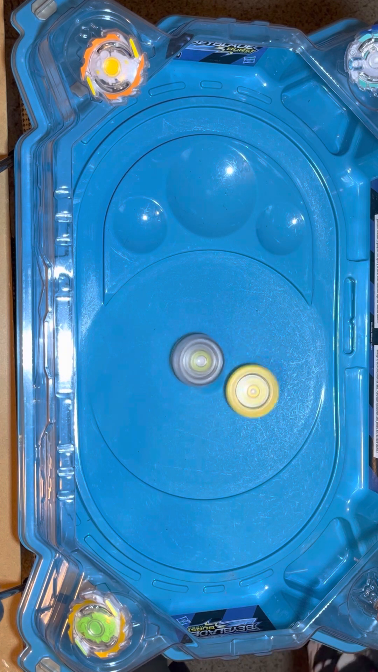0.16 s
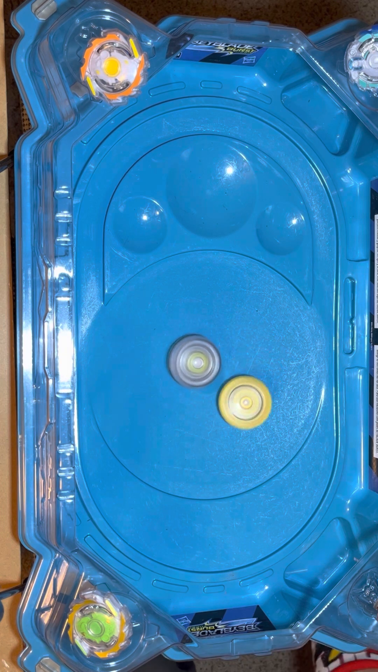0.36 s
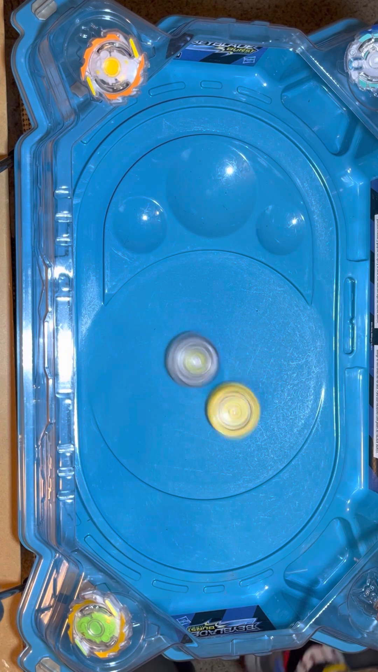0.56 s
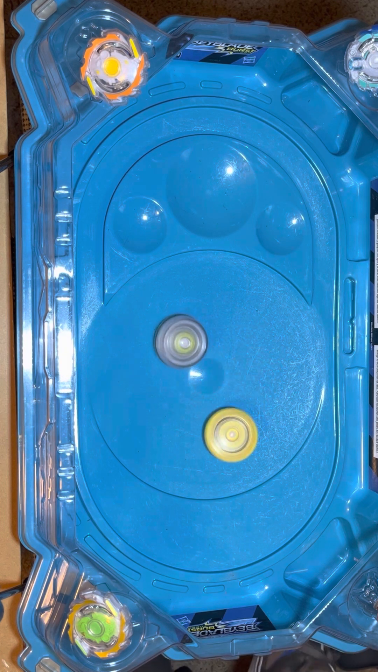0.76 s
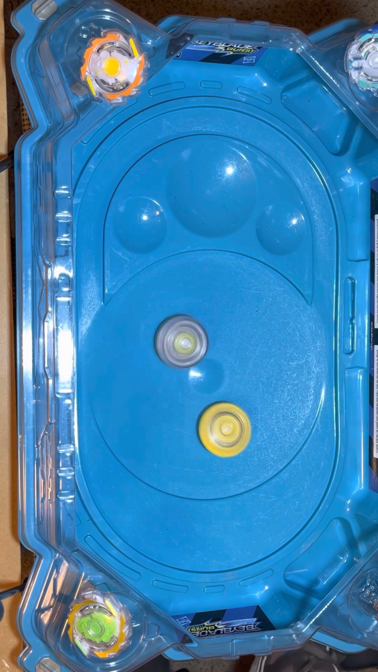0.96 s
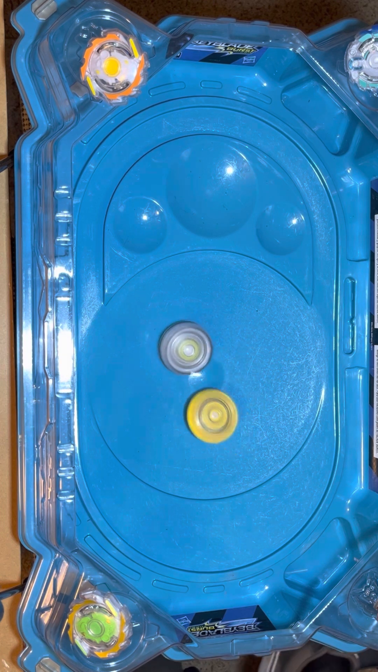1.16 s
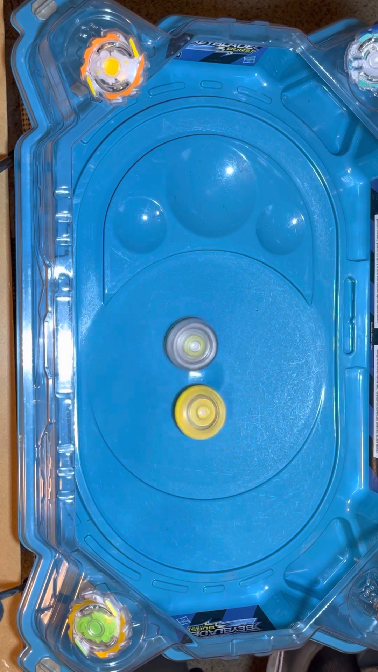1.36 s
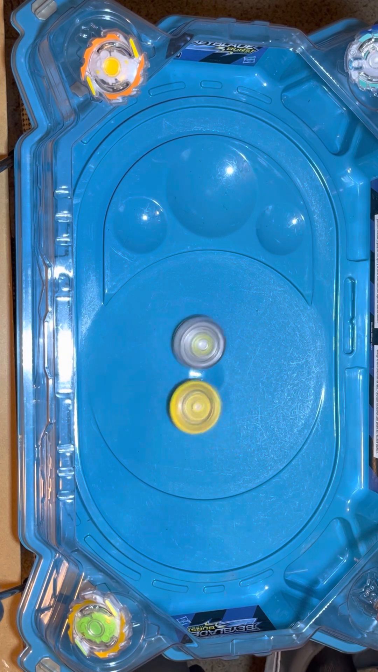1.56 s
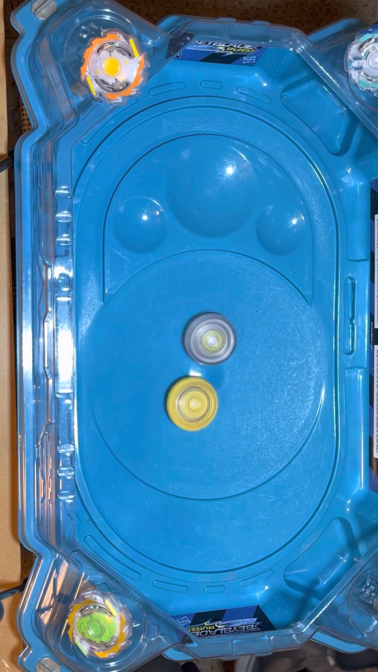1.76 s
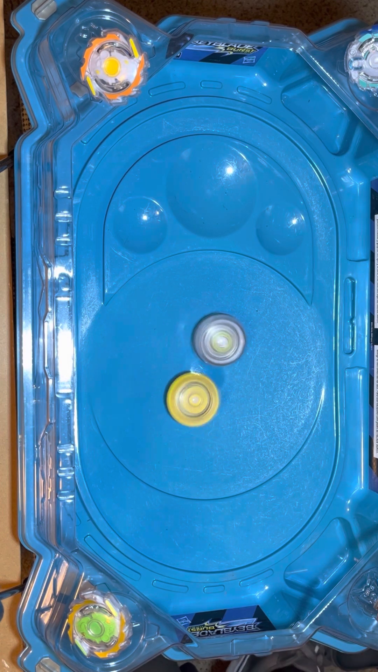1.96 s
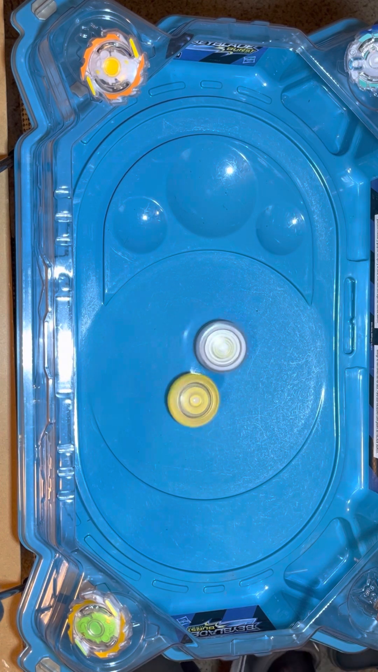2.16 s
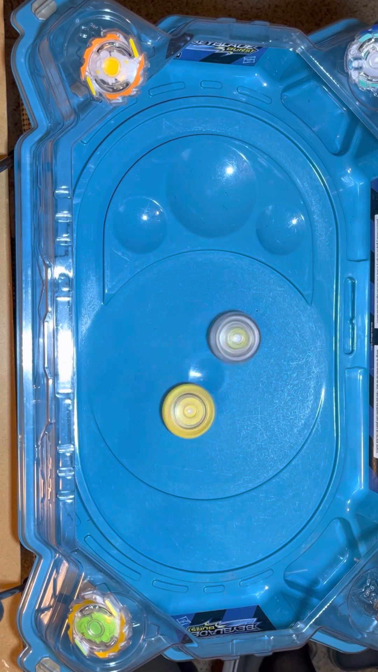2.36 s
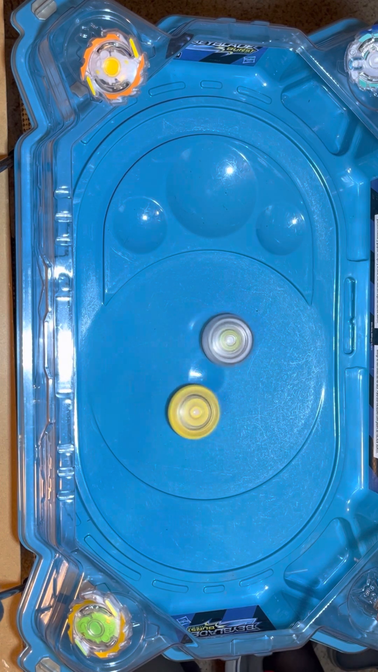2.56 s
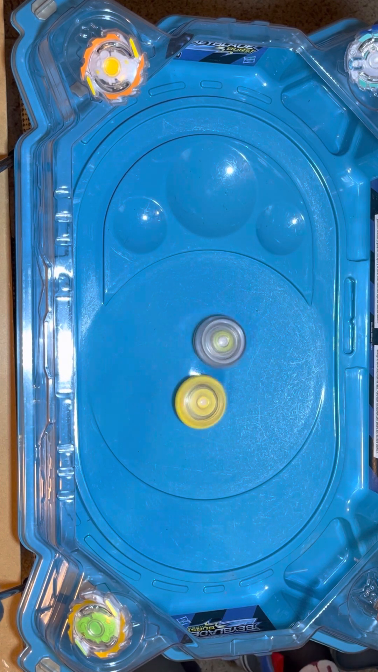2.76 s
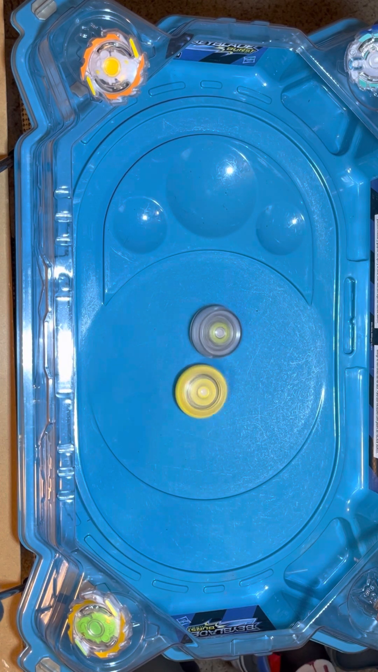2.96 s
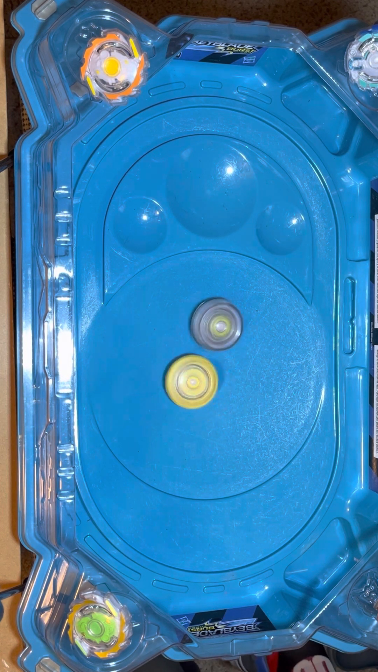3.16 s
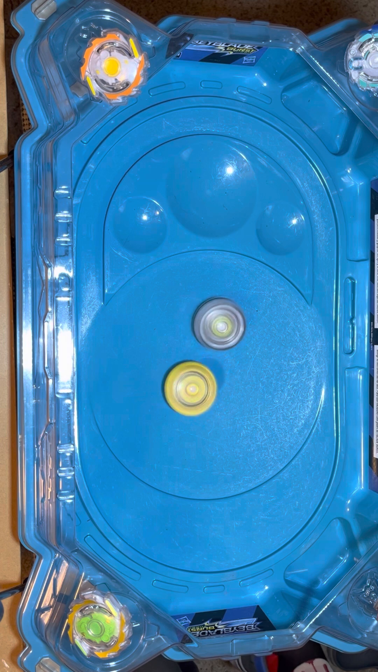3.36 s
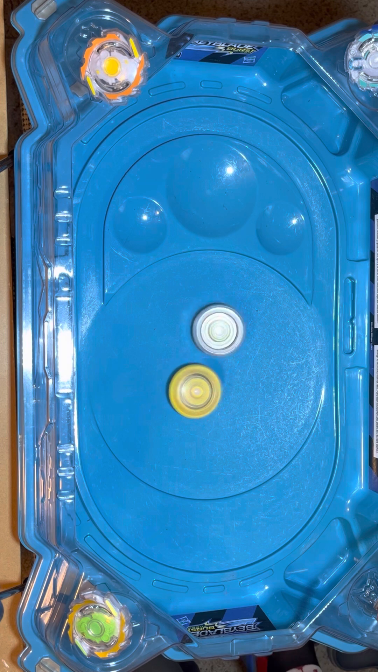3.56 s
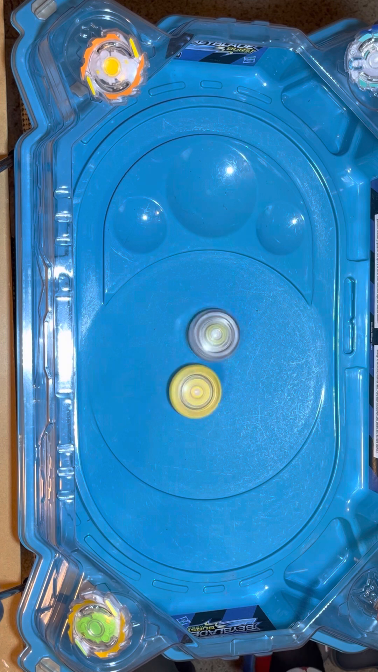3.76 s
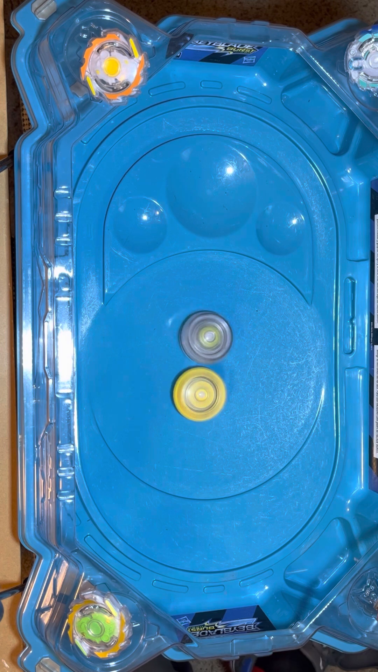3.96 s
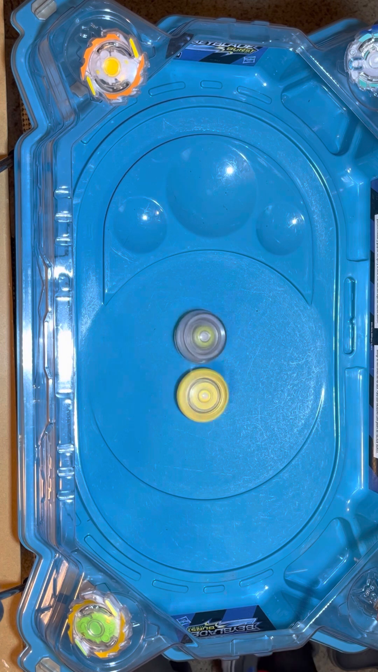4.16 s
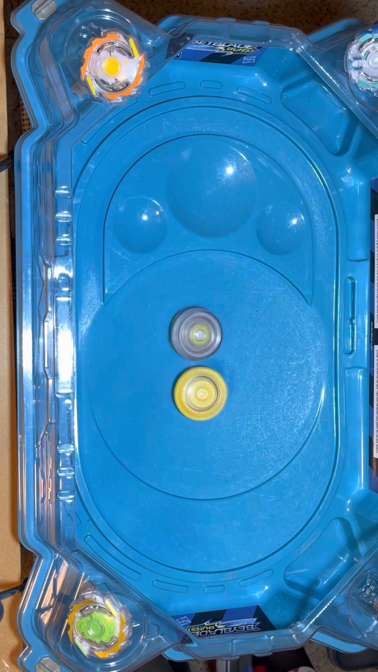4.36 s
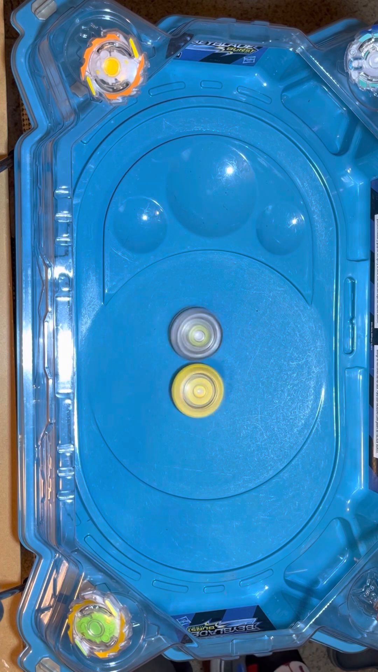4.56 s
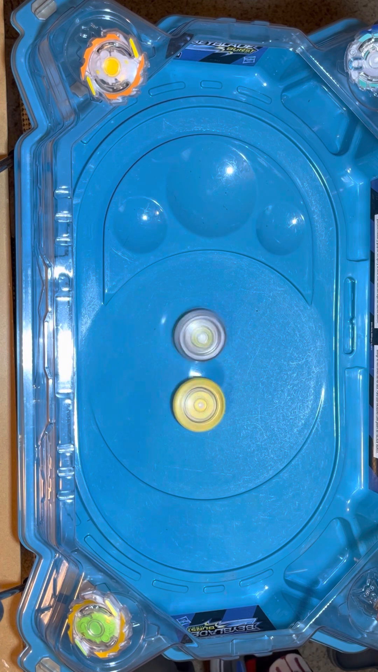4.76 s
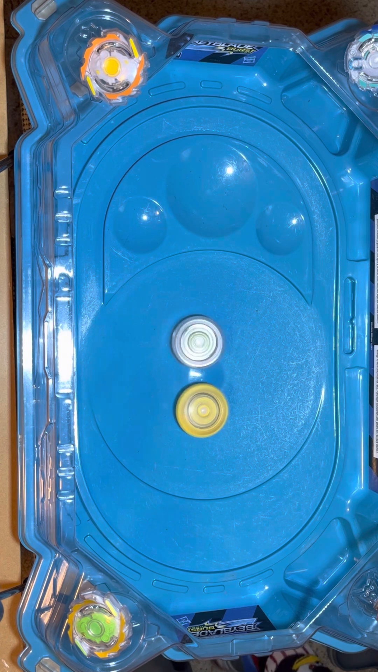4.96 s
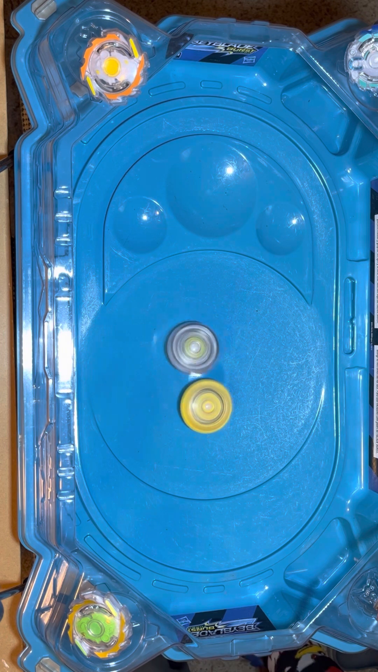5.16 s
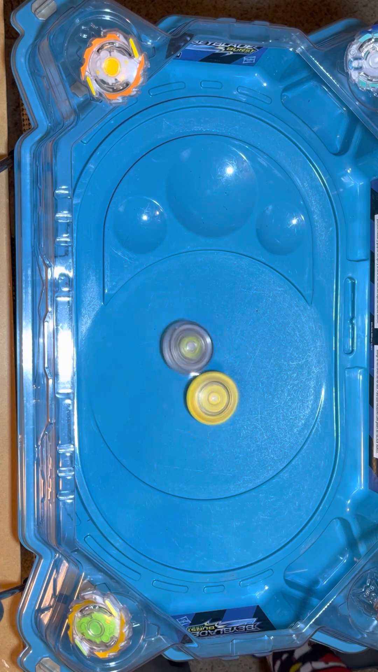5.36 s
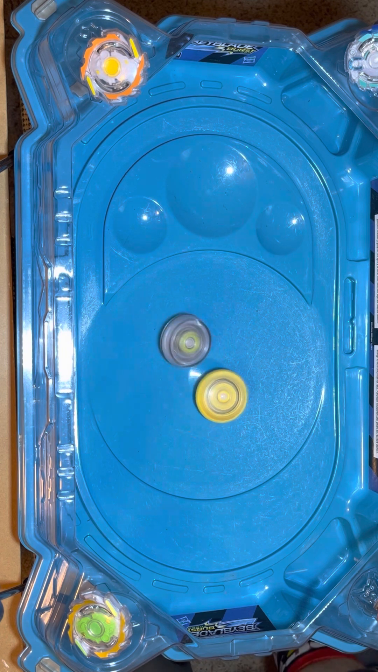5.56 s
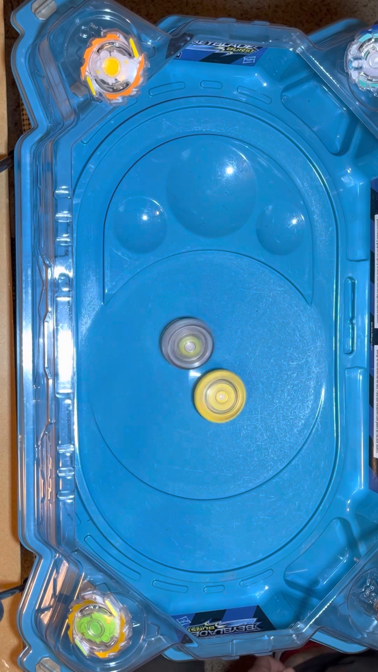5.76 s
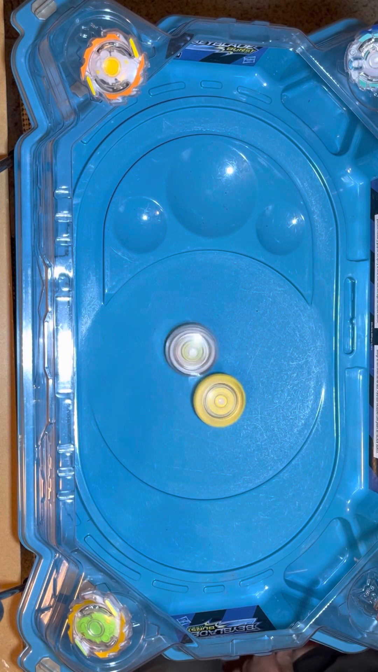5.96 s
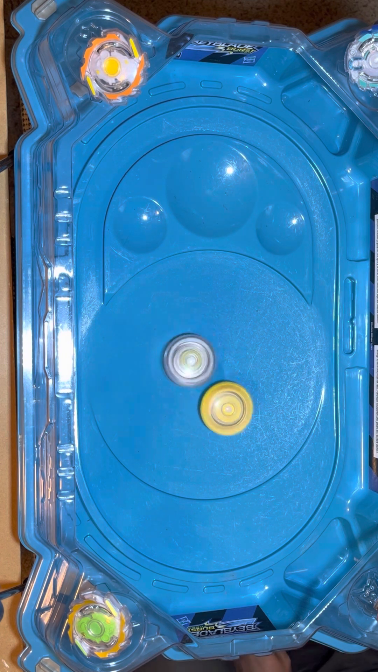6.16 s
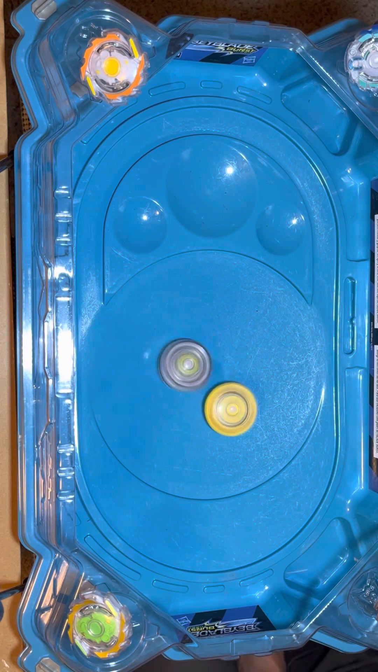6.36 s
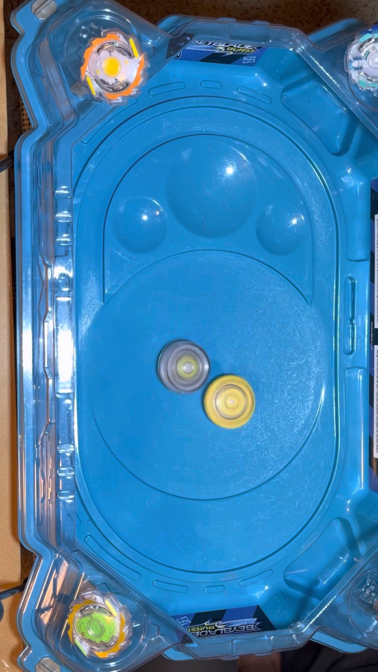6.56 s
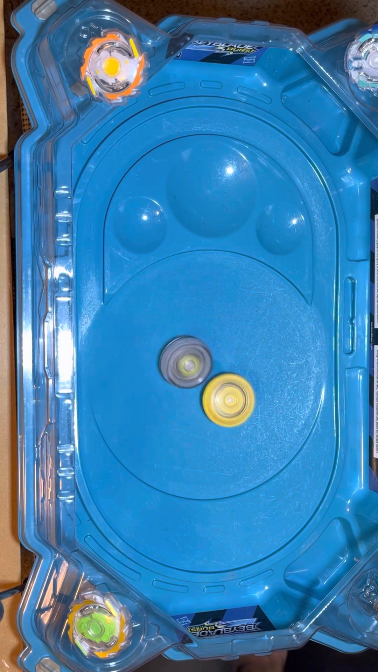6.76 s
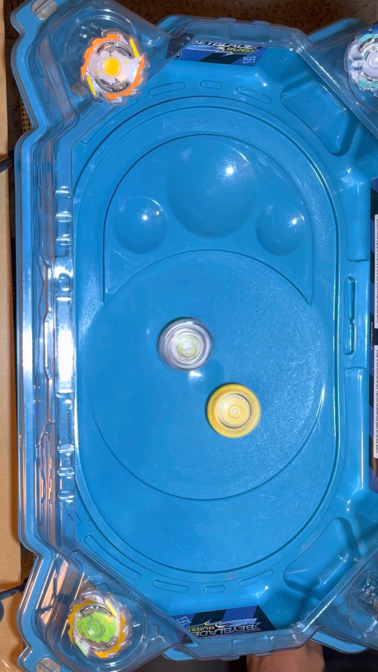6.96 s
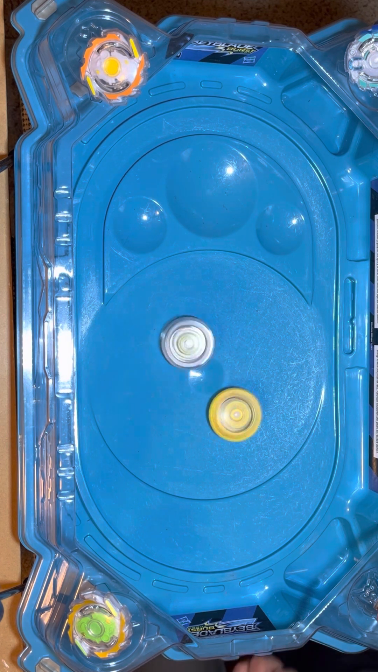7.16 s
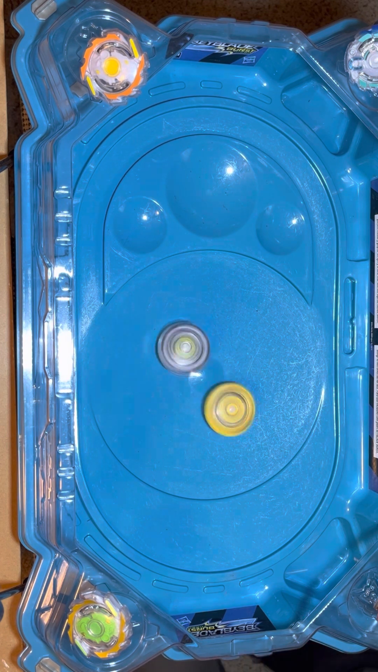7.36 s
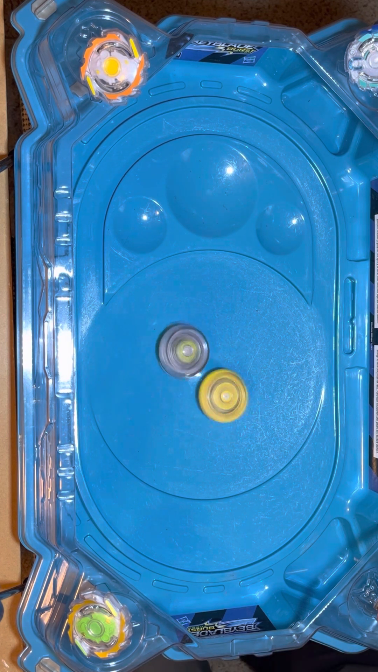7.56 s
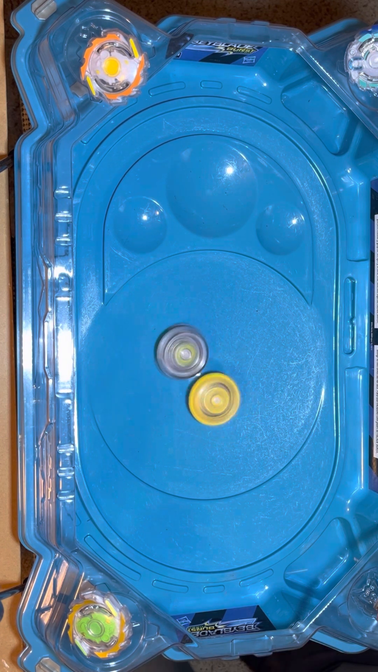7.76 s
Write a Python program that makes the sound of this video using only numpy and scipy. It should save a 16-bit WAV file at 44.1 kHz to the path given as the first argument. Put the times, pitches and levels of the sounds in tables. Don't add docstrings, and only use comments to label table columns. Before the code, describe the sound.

A close, dry stereo view of two spinning tops in a thin plastic arena, with a low hum near 120 Hz wavering throughout. A bright crack comes at 0.1 s, another at 0.55 with a scratchy skid, then fine rapid ticking as a top leans. A tight double lands at about 1.3, then hits at 1.55, 1.9 (double) and 2.25. After a quieter scrape, hollower knocks fall at 2.85 and 3.15, with duller, softer ones at 3.7 and 4.0. A sharp crack at 4.6 leads to faint sliding. A cluster at 5.2-5.4 is followed by quick small ticks until 5.9, when two heavier knocks arrive by 6.1. Loud cracks at 6.65 and 6.9 ring briefly, light scratches follow, and two last clacks come at 7.7 and 7.8. Each hit is a millisecond-sharp toothy snap, a short rim ring, a tray boom and a rattling tail of about a quarter second.

```python
import sys
import numpy as np
from scipy import signal
from scipy.fft import rfft, irfft, next_fast_len
from scipy.io import wavfile
from scipy.ndimage import uniform_filter1d

SR = 44100
rng = np.random.default_rng(int(sys.argv[2]) if len(sys.argv) > 2 else 0)


def dump(signal):
    limited = np.clip(np.atleast_2d(signal).T, -1, 1)
    pcm = np.round(limited * 32767).astype(np.int16)
    wavfile.write(sys.argv[1], SR, pcm)


def makeup_ratio(level_db):
    decades = np.asarray(level_db, float) / 20
    return 10 ** decades


N = 347949
LEAD = 256


def shape(x, points):
    hz, db = np.transpose(points)
    n = next_fast_len(len(x))
    f = np.maximum(np.fft.rfftfreq(n, 1 / SR), 1)
    gain = makeup_ratio(np.interp(np.log(f), np.log(hz), db))
    return irfft(rfft(x, n) * gain, n)[:len(x)]


def tilt(x, db):
    return shape(x, [(4000, 0.0056), (8000, db)])


def unit(x):
    return x / np.sqrt(np.mean(x ** 2))


def band(hz, width_hz, count, order=1):
    x = rng.standard_normal(count)
    for _ in range(order):
        x = signal.lfilter(*signal.iirpeak(hz, hz / width_hz, SR), x)
    return unit(x)


def walk(rate, count=N):
    hold = int(SR / rate)
    steps = np.repeat(rng.standard_normal(count // hold + 1), hold)
    return 1.14 * uniform_filter1d(uniform_filter1d(steps, hold), hold)[:count]


def grit(rate, depth, count=N):
    strength = np.minimum(rng.exponential(size=count), 3)
    presses = (rng.random(count) < rate / SR) * strength
    return unit(1 + depth * signal.lfilter([1], [1, -np.exp(-1 / (0.003 * SR))], presses))


def fade(t, t60):
    return np.exp(-np.log(1000) * t / t60)


def after(count):
    return np.maximum(np.arange(count) - LEAD, 0) / SR


def ring(t, modes, scatter_db, detune, rise_s):
    chance, out = rng.standard_normal((len(modes), 3)), np.zeros(len(t))
    for (hz, db, t60), (a, b, c) in zip(modes, chance):
        u = t[:LEAD + int(1.5 * t60 * SR)]
        wave = np.sin(2 * np.pi * hz * (1 + detune * b) * u + 2 * c)
        out[:len(u)] += makeup_ratio(db + scatter_db * a) * fade(u, t60) * wave
    return out * (1 - np.exp(-t / rise_s))


def louder(*gains):
    return 10 * np.log10(sum(g ** 2 for g in gains))


def add(out, s, x):
    i = int(s * SR) - LEAD
    out[i:i + len(x)] += x[:N - i]


# [f/Hz, level/dB]
ROOM = [(30, -29.5), (55, 0.5), (195, -8), (300, -5.5), (500, -15.5), (1500, -24), (4000, -36.5),
        (15000, -57.5)]


def room():
    return makeup_ratio(-62.5) * unit(shape(rng.standard_normal(N), ROOM)) * makeup_ratio(0.89 * walk(26))


def hum(t):
    mains_hz, motor_hz, in_step_s = 119.95, 122.6, 3.85
    phase = 2 * np.pi * mains_hz * (t - in_step_s) + 0.2 * walk(12)
    motor = makeup_ratio(-8 + 2.7 * walk(3.6)) * np.sin(2 * np.pi * motor_hz * (t - in_step_s))
    lines = np.sin(phase) + makeup_ratio(-22.0) * np.sin(2 * phase + .5) + motor
    return makeup_ratio(-47) * lines + makeup_ratio(-55.5) * band(124.1, 14, N)


# [t/s, rate/turns per s, level/dB]
WOBBLE = [(0, 44, -59), (0.502, 43.3, -55), (.62, 41.3, -65), (.8, 41.1, -55), (1.201, 40.6, -50.5),
          (1.4, 39, -75), (5.098, 21.8, -75), (5.5, 49, -90), (5.898, 28, -76), (6.3, 20.5, -87),
          (7.89, 22, -63.5)]
# [multiple of the rotation rate, level/dB]
WOBBLE_ORDERS = [(2, 2.5), (3, -9.5), (4, -5), (5, -9), (6, -12.5)]


def drone(t):
    s, rate, db = np.transpose(WOBBLE)
    turns_per_s = np.interp(t, s, rate)
    turn = 2 * np.pi * np.cumsum(turns_per_s) / SR
    out = np.zeros(N)
    for k, g in WOBBLE_ORDERS:
        near_mode = np.exp(-((k * turns_per_s - 190) / 20) ** 2)
        out += makeup_ratio(g) * (1 + 2 * near_mode) * np.sin(k * turn + k * k)
    return makeup_ratio(np.interp(t, s, db)) * out, turn


# [t/s, pressure level/dB, slip level/dB, lean level/dB]
BEARING = [(0, -57, -2.5, 1), (.3, -58, -8, -1), (1.2, -56.5, -5, 3), (1.45, -61, -9.5, 4.5),
           (1.75, -59.5, 0.5, 4), (2.1, -59.5, -7.5, -2.5), (2.8, -71, -4, 12), (2.97, -51, -24.5, 2.5),
           (3.25, -57, -8.5, 3.5), (4.2, -60, -14.5, -0.5), (4.55, -59.5, -1, -1.5), (5.2, -71, -11.5, 1),
           (5.45, -53.5, -28, -2), (5.8, -51.5, -13, 1.5), (6.07, -50.5, -8, -28), (6.3, -60.5, -8, -7.5),
           (7.1, -70.5, -7, 8.5), (7.89, -54.5, -21, -1.5)]


def effort(t):
    slow = t[::64]
    s, press_db, slip_db, lean_db = np.transpose(BEARING)

    def since(moment):
        return np.maximum(slow - moment, 0)

    rocking = [makeup_ratio(row[1] - 40.5) * (slow > row[0]) * fade(since(row[0]), 0.8) for row in CLASHES]
    scrape_db = louder(makeup_ratio(np.interp(slow, s, press_db)), *rocking)
    shaking = []
    for start, length, db, _ in SKIDS:
        if min(abs(start - row[0]) for row in CLASHES) < .1:
            onset = 1 - np.exp(-since(start) / 0.019)
            shaking.append(makeup_ratio(-40.5 + 2 * (db + 49)) * onset * fade(since(start + length), 0.27))
    pressed_db = -57.5 + 1.33 * (scrape_db + 61.0) + np.interp(slow, s, lean_db)
    rumble_db = louder(makeup_ratio(pressed_db), *shaking)
    levels = scrape_db, scrape_db + np.interp(slow, s, slip_db), rumble_db
    return [np.interp(t, slow, db) + 1.2 * walk(7) for db in levels]


# [f/Hz, width/Hz, level/dB]
SCRAPE = [(840, 180, 6), (1250, 680, 8.5), (1800, 200, 5.5), (2280, 150, 1.5)]
# [f/Hz, width/Hz, level/dB]
HISS = [(3250, 900, 2.5), (3970, 390, -3.5), (5450, 170, -1.5), (6300, 480, 1.5), (11500, 2300, -5)]


def tips(scrape_db, hiss_db, rumble_db, turn):
    press = makeup_ratio(2.1 * np.cos(turn) + 2.0 * walk(35))
    scrape = sum(makeup_ratio(g + 3.8 * walk(14)) * band(hz, w, N) for hz, w, g in SCRAPE)
    hiss = sum(makeup_ratio(g + 2.4 * walk(30)) * band(hz, w, N) for hz, w, g in HISS)
    rough = grit(rate=120., depth=.9)
    high_pass = signal.butter(4, 42, "high", fs=SR, output="sos")
    rumble = signal.sosfilt(high_pass, band(63, 24, N) + makeup_ratio(-0.5) * band(87, 28, N))
    sliding = makeup_ratio(scrape_db - 3.5) * rough * unit(scrape) + makeup_ratio(hiss_db) * unit(hiss)
    return press * sliding + makeup_ratio(rumble_db - 4.0) * unit(rumble)


# [t/s, peak level/dB, tray knock level/dB, tray boom level/dB, tail level/dB]
CLASHES = [(0.0912, -8, -40, -27.5, -24.5), (0.545, -12, -30.5, -19.5, -17),
           (1.267, -10.5, -24, -29.5, -19), (1.3081, -10.5, -18, -18.5, -22),
           (1.5394, -10.5, -23, -23, -18.5), (1.8717, -9, -25.5, -25.5, -21),
           (1.9208, -11.5, -13.5, -22.5, -24), (2.2369, -7, -23.5, -21.5, -22.5),
           (2.84, -15, -16, -14, -17.5), (3.134, -13, -13.5, -18.5, -21.5), (3.717, -21, -14, -18.5, -18.5),
           (4.0194, -24, -18.5, -30, -21.5), (4.5826, -8, -13, -22, -24), (5.2283, -18.5, -39.5, -27, -22),
           (5.25, -19, -20.5, -25, -26), (5.357, -8, -30, -31.5, -25.5), (5.905, -17.5, -18.5, -20, -19.5),
           (6.099, -21, -21, -16, -21.5), (6.6395, -20, -39, -24, -20), (6.659, -6, -21, -32.5, -23),
           (6.877, -8, -25, -23.5, -19.5), (7.6802, -11.5, -24, -19.5, -22.5),
           (7.817, -10, -18, -17.5, -21)]
# [loudest t/s, build-up/ms, ring-down/ms, brightness level/dB, tail length/share]
CRACKS = [(0.0928, 1.1, 8.8, -1, 1), (0.5457, 0.69, 9, 3, 0.94), (1.268, 0.86, 10, -1, 1),
          (1.3088, 0.62, 13, -2, 0.77), (1.5412, 0.41, 3.5, 1, 0.97), (1.8727, .5, 8, 0.5, 0.82),
          (1.921, .7, 14, -1.5, 0.89), (2.2386, 1.3, 5.9, -3.5, 0.96), (2.8413, 1, 20, -1.5, 0.89),
          (3.135, 0.59, 11, 3.5, 0.75), (3.7184, 0.76, 18, -2.5, 0.89), (4.0212, 1.2, 5.7, 2, 0.81),
          (4.5834, 0.51, 11, 2.5, 0.79), (5.2283, 0.7, 6.1, 0, 1), (5.2514, 0.55, 9, 0, 0.84),
          (5.3586, 0.8, 8.1, -1, 0.91), (5.9061, 0.53, 16.6, 0.5, 0.93), (6.102, 1.5, 6, -2, 0.7),
          (6.6399, .6, 12, 1.5, 1), (6.6598, 0.35, 8.8, -1, 0.83), (6.8781, 1.3, 6.1, -2.5, 0.85),
          (7.6819, 0.46, 10, -4, 0.75), (7.8165, 0.54, 13, -1, 1)]
KNOCK_HZ = [790, 760, 960, 640, 640, 700, 790, 960, 880, 750, 700, 800, 800, 960, 830, 640, 815, 760, 700,
            640, 800, 700, 860]
# [f/Hz, level/dB]
CRACK = [(500, -30), (1200, -9.5), (2000, -3), (4000, -5.5), (7000, -1), (10000, -7.5), (12000, -7),
         (14300, -9), (14800, -9), (15600, -6), (17000, -12.5)]
# [f/Hz, level/dB, t60/s]
RIMS = [(1154, -5.5, 0.075), (1235, -14.5, 0.085), (1750, -18, 0.014), (1800, -5, 0.025),
        (2020, -7.5, 0.026), (2276, -3.5, 0.15), (2836, 3, 0.039), (3190, -8.5, 0.015), (3720, -2.5, 0.018),
        (4500, -6, 0.01), (5080, 0, 0.086), (6430, -9.5, 0.037), (7600, -8, 0.021), (8000, -3.5, 0.0086),
        (9400, -10, 0.011), (12150, -9, 0.022), (13900, -9, 0.033)]
# [f/Hz, level/dB, t60/s]
TAIL = [(258, -9, 0.32), (680, -11, .35), (1180, -5.5, 0.23), (2400, -1.5, 0.24), (4930, -1, 0.23),
        (9000, -8, 0.21), (13800, -12.5, 0.24)]
# [f/Hz, level/dB, t60/s]
TRAY = [(636, -2.5, 0.13), (759, -7.5, 0.13), (830, 2.5, 0.054), (962, -7.5, 0.083), (402, -14, 0.28)]
# [f/Hz, level/dB, t60/s]
BOOM = [(56.2, -14, .35), (67, -6, 0.23), (78.2, -3, 0.45), (100.6, -3, 0.17), (144.8, -1, .3),
        (197.6, -6.5, 0.3), (257.6, -8, 0.24), (302.6, -9.5, 0.13)]


def clashes():
    out, t = np.zeros(N), after(count=16384)
    hz, crack_db = np.transpose(CRACK)
    for clash, crack, knock_hz in zip(CLASHES, CRACKS, KNOCK_HZ):
        s, db, knock_db, boom_db, tail_db = clash
        peak_s, rise_ms, fall_ms, bright_db, share = crack
        start = s - .0003
        u = 1000 * ((np.arange(len(t)) - LEAD) / SR + start - peak_s)
        build_up = np.exp(-(np.minimum(u, 0) / max(rise_ms, .2)) ** 2)
        chatter = rng.uniform(-1.7, 1.7, len(t)) * build_up
        late = shape(chatter * makeup_ratio(-16.0) * fade(np.maximum(u, 0), 53.0), [(13800, -0.5), (14600, -35.5)])
        chatter = chatter * fade(np.maximum(u, 0), fall_ms) + late
        colour = np.transpose([hz, crack_db + 1.2 * rng.standard_normal(len(hz))])
        hit = makeup_ratio(5.5) * shape(chatter, colour)
        hit += makeup_ratio(-23.5) * ring(t, RIMS, scatter_db=1.5, detune=0.013, rise_s=0.00062)

        tail = np.zeros(len(t))
        for f, g, t60 in TAIL:
            knock_lift_db = (f < 800) * 0.78 * (knock_db + 22.5)
            lumps = makeup_ratio(g + 2.0 * walk(70, count=len(t)) + knock_lift_db)
            tail += lumps * band(f, 1.02 * f, len(t), order=2) * fade(t, t60 * share)
        tail *= grit(rate=160., depth=1., count=len(t))
        tail = shape(tail, [(13800, 0), (14600, -35)])
        fed = np.zeros(len(t))
        for (f, _, _), c in zip(RIMS, rng.standard_normal(len(RIMS))):
            fed += makeup_ratio(2.5 * c) * signal.lfilter(*signal.iirpeak(f * (1 + .025 * c), 30, SR), tail)
        tail += makeup_ratio(-2.0) * fed

        lift_db = 8.5 + 0.5137 * db + 0.3 * (tail_db + 20.5) + bright_db
        hit = tilt(hit + makeup_ratio(tail_db) * tail * (1 - np.exp(-t / 0.0057)), lift_db)
        tray = [(f, g + 3 - 13 * abs(np.log2(f / knock_hz)), t60) for f, g, t60 in TRAY]
        hit += makeup_ratio(knock_db + 0.5) * ring(t, tray, scatter_db=1.5, detune=.02, rise_s=.003)
        hit += makeup_ratio(boom_db) * ring(t, BOOM, scatter_db=2.5, detune=.03, rise_s=0.015)
        add(out, start, makeup_ratio(db) * hit)
    return out


# [t/s, low ring level/dB, low f/Hz, high f/Hz, high minus low level/dB]
SPOTS = [(0.092, -16.5, 2836, 6920, 15.5), (0.5443, -6.5, 1750, 7900, -17.5),
         (1.2658, -10, 1768, 7200, -18.5), (1.3106, -16, 1747, 8950, -3), (1.5404, -30, 1747, 7100, 8.5),
         (1.8727, -15.5, 1810, 8300, -3.5), (1.9205, -16, 1865, 4860, 2), (2.236, -26, 1744, 8600, -1.5),
         (2.8409, -17, 1870, 7330, -10), (3.1325, -23, 1750, 4980, 15), (3.718, -24, 1927, 5250, 8),
         (4.0178, -26, 1800, 4990, 5), (4.5854, -33, 1800, 8130, 14.5), (5.2264, -25, 1824, 7000, 4.5),
         (5.2503, -32, 2050, 7460, 8), (5.3593, -12.5, 1764, 8240, -22), (5.908, -18, 1750, 4930, 2),
         (6.098, -30, 1910, 7600, 6), (6.6373, -28, 1860, 3650, 2), (6.6578, -11, 1800, 7600, -11),
         (6.8768, -20, 2090, 7700, -3), (7.679, -15, 1800, 8000, -4), (7.816, -37, 1800, 8400, 0)]


def spots():
    out, t = np.zeros(N), after(SR // 8)
    for s, db, low_hz, high_hz, high_db in SPOTS:
        modes = [(low_hz, -8, .045), (high_hz, high_db - 8.0, .02)]
        add(out, s, makeup_ratio(db) * ring(t, modes, scatter_db=2.5, detune=0, rise_s=0.00072))
    return out


# [t/s, f/Hz, level/dB, t60/s]
PINGS = [(.531, 5040, -38, 0.11), (.5575, 5000, -19.5, 0.022), (.570, 4180, -29, .02),
         (1.5524, 1050, -14.5, 0.0087), (1.533, 1240, -41.5, .05), (2.829, 2000, -54, 0.05),
         (6.869, 4500, -40, .05), (4.34, 1770, -45, 0.028), (4.378, 1500, -49, 0.044),
         (.095, 760, -34.5, .06), (5.518, 3750, -51, 0.065), (5.5465, 3750, -52, .05),
         (5.5655, 3750, -51, 0.057), (5.6139, 3800, -47, 0.04), (5.6398, 3750, -53, .05),
         (5.7092, 3850, -47.5, .05), (5.7566, 3750, -52, .05), (5.805, 3750, -50, 0.057),
         (6.2283, 3590, -53, 0.028), (6.2283, 1750, -50.5, .03), (6.2502, 3400, -44, 0.038),
         (6.343, 993, -55, 0.034), (6.3774, 1854, -47.5, .03), (6.3959, 1800, -50, .03),
         (6.438, 1800, -56, .04), (6.4822, 3800, -60, .03), (6.5, 3650, -60, 0.033),
         (6.5366, 1910, -61, .03), (6.5855, 3950, -55.5, 0.026), (6.588, 1098, -49.5, .03),
         (7.1572, 3870, -46, 0.027), (7.1836, 3840, -44.5, 0.032), (7.198, 3710, -52, .03),
         (7.3602, 3750, -63, 0.056), (7.3872, 3750, -57, 0.036), (7.4036, 3750, -44, 0.024),
         (7.42, 3900, -58.5, .03), (7.5683, 3800, -61, .03), (7.5827, 3830, -53.5, .03),
         (6.94, 1887, -36, .04), (6.952, 3920, -33, 0.026)]


def pings():
    out, t = np.zeros(N), after(count=8192)
    for s, f, db, t60 in PINGS:
        pair = [(f, 0, t60), (.965 * f, -2, t60)]
        add(out, s, makeup_ratio(db) * ring(t, pair, scatter_db=1., detune=.004, rise_s=.0015))
    return out


# [first t/s, last t/s, rate/turns per s, peak level/dB, brightness level/dB]
RUNS = [(0.312, .512, 51, -53, -15.5), (0.749, .844, 41.1, -35, -18), (0.868, .966, 43, -36, -22),
        (1.067, 1.112, 45, -43, -11), (1.139, 1.2356, 40.6, -34.5, -12), (2.591, 2.647, 37, -41.5, -6),
        (3.316, 3.478, 22, -40, -20), (4.095, 4.254, 25, -39, -17), (6.557, 6.5843, 34, -41, -32)]


def catches():
    rows, jitter_s, scatter_db = [], .0008, 2.
    for first, last, rate, db, bright_db in RUNS:
        chance = rng.standard_normal((16, 3))
        for s, (a, b, c) in zip(np.arange(first, last + .5 / rate, 1 / rate), chance):
            rows.append((s + jitter_s * a, db + scatter_db * b, bright_db + scatter_db * c))
    return rows


# [t/s, peak level/dB, brightness level/dB]
TICKS = [(0.695, -35, -11), (1.0136, -30, -19), (1.04, -26, -17), (1.9795, -18.5, -26), (2.3182, -29, -23),
         (2.999, -30.5, -9.5), (3.028, -43, 2), (3.9665, -34, -26), (4.8384, -30.5, -7.5),
         (5.309, -37, -18), (5.4493, -32, -20), (5.4757, -30, -8), (5.4992, -36, -11), (5.519, -29.5, -6),
         (5.5465, -41, -18), (5.5653, -29.5, -7), (5.594, -34, -18), (5.6139, -29.5, -7),
         (5.64, -37.5, -20), (5.663, -30.5, -11), (5.71, -30, -8.5), (5.756, -30, -7), (5.78, -36, -20),
         (5.805, -30.5, -6.5), (5.8494, -44, -20), (5.8701, -31.5, -13), (6.0800, -23, -23),
         (6.2287, -46.5, -22.5), (6.2516, -26, -12.5), (6.4824, -41, -21), (6.81, -29, -21),
         (6.979, -16, -18), (7.1547, -33, -26.5), (7.185, -37, -31.5), (7.293, -36.5, -23),
         (7.4043, -36.5, -20), (7.7798, -34.5, -15), (6.9397, -21, -19), (7.735, -36.5, -20)]
# [f/Hz, level/dB]
TICK = [(800, -22), (1400, -5), (2050, 4), (2700, -8), (3750, -6), (4600, -9), (5600, -12), (7100, -2),
        (9000, -11), (12800, -8), (16000, -18)]


def ticks():
    out, t = np.zeros(N), after(count=4096)
    for s, db, bright_db in TICKS + catches():
        noise = rng.standard_normal((2, len(t))) * (t > 0)
        click, scratch = noise * [fade(t, .008), fade(t, .06)]
        body = unit(shape(click, TICK)) + makeup_ratio(-1) * unit(shape(scratch, TICK))
        add(out, s - .0003, makeup_ratio(db - 31.0) * tilt(body, max(bright_db, -18) + 3.5))
    return out


# [t/s, length/s, level/dB, brightness level/dB]
SKIDS = [(0.562, 0.1, -46, -2), (1.932, 0.066, -54.5, 12.5), (2.264, 0.093, -48.5, -20),
         (2.864, 0.045, -47.5, -10), (4.271, 0.18, -62.5, 5), (4.402, 0.24, -57.5, 5),
         (4.832, 0.072, -57, -0.5), (5.926, 0.12, -49.5, 6.5), (6.36, 0.072, -50.5, 3),
         (6.891, 0.12, -45, 3.5), (7.159, 0.048, -55.5, -12), (7.358, 0.066, -64, -9),
         (7.524, 0.1, -65, -14), (7.603, 0.053, -46, -3), (7.701, 0.093, -50, -14)]
# [f/Hz, width/Hz, level/dB]
DRAG = [(400, 90, 0.5), (762, 150, 4), (1280, 450, 5), (3400, 3900, 4.5), (1800, 100, 5.5), (2050, 220, 4),
        (2858, 300, 1), (3750, 160, -0.5), (4110, 200, -5.5), (5000, 470, 0), (7600, 3700, -6.5),
        (11800, 2600, -6)]


def skids():
    out, t = np.zeros(N), after(count=12288)
    for s, length, db, bright_db in SKIDS:
        drag = sum(makeup_ratio(g + 2.8 * walk(70, count=len(t))) * band(hz, w, len(t)) for hz, w, g in DRAG)
        drag *= grit(rate=150., depth=.5, count=len(t))
        bite = 1 - np.exp(-t / (0.6 * length ** 2))
        drag *= bite * fade(np.maximum(t - length, 0), 0.12) * fade(t, 8.9 * length)
        colour = [(2400, 0.004), (3600, 0.68 * bright_db), (8000, bright_db)]
        add(out, s, makeup_ratio(db) * shape(unit(drag), colour) / np.sqrt(3))
    return out


# [t/s, f/Hz,
# level/dB]
BUMPS = [(.6, 1800, -28), (1.268, 1100, -21), (1.541, 2210, -22), (2.239, 1046, -24), (2.272, 1045, -32),
         (2.32, 750, -35), (2.355, 1100, -39.5), (2.905, 760, -34), (2.985, 2050, -47), (3.155, 736, -30),
         (3.24, 730, -44), (3.265, 950, -45), (3.355, 706, -47), (3.45, 950, -46), (3.473, 960, -44),
         (3.49, 1250, -47), (3.56, 1230, -48), (3.635, 880, -45), (4.843, 418, -40), (4.935, 558, -52.5),
         (4.967, 1150, -53), (5.27, 800, -42), (5.52, 910, -47), (5.565, 1530, -40), (5.575, 910, -51),
         (5.618, 840, -41), (5.762, 830, -40), (5.808, 830, -47), (5.808, 1750, -47), (6.079, 1880, -40)]
# [first t/s, last t/s, rate/turns per s, f/Hz, level/dB]
BUMP_RUNS = [(2.391, 2.507, 35.7, 1074, -51.5), (2.59, 2.708, 35.2, 1095, -51)]


def bumps():
    out, t, t60 = np.zeros(N), after(count=4096), 0.046
    turns = []
    for first, last, rate, f, db in BUMP_RUNS:
        for s in np.arange(first, last + .5 / rate, 1 / rate):
            turns.append((s, f, db - 30 * (s - first)))
    for s, f, db in BUMPS + turns:
        pair = [(f, 0, t60), (1.09 * f, -5, t60)]
        add(out, s, makeup_ratio(db) * ring(t, pair, scatter_db=1., detune=.01, rise_s=.003))
    return out


# [t/s, f/Hz, level/dB, t60/s]
SINGING = [(1.308, 12150, -29, 0.16), (1.308, 15700, -56, .4), (1.921, 15700, -34, .15),
           (2.237, 12150, -39.5, 0.21), (2.86, 4480, -47, 0.4), (3.134, 15700, -45, .2),
           (2.99, 4120, -60.5, 0.3), (3.849, 1250, -59, 0.22), (4.583, 15500, -51, 0.27),
           (5.357, 12000, -40, .12), (6.099, 4650, -54, 0.29), (6.659, 6930, -47, 0.49),
           (6.877, 6600, -43.5, 0.53)]


def singing():
    out, t = np.zeros(N), after(count=16384)
    beat = 1 + .5 * np.sin(2 * np.pi * 45 * t)
    for s, f, db, t60 in SINGING:
        add(out, s, makeup_ratio(db) * ring(t, [(f, 0, t60)], scatter_db=3.0, detune=0, rise_s=.003) * beat)
    return out


def scene():
    t = np.arange(N) / SR
    wobble, turn = drone(t)
    sound = room() + hum(t) + wobble + tips(*effort(t), turn)
    sound += clashes() + spots() + pings() + ticks() + skids() + bumps() + singing()
    echoes = rng.standard_normal((2, 4096)) * fade(np.arange(4096) / SR, .09)
    diffuse = signal.sosfilt(signal.butter(4, [220, 3600], "band", fs=SR, output="sos"), sound)
    return sound + makeup_ratio(-33) * signal.fftconvolve(diffuse[None], echoes, axes=1)[:, :N]


# [f/Hz, right lead/rad, left minus right level/dB]
PORTS = [(0, .1, -1), (430, .75, -4), (800, .2, -5), (1300, .35, -2), (1680, .1, -1.3), (2520, -2.25, -.5),
         (3650, -1.05, -.3), (4700, -1.45, -.6), (5150, -1.6, -.3), (5600, -2.85, 0), (6350, -3.45, 0),
         (7580, -5.9, 0), (8870, -7.2, 0), (9700, -9.1, 0), (10900, -9.8, 0), (11800, -12.2, .2),
         (13100, -12.9, .2), (14000, -15.3, .2), (15200, -15.9, .2), (15900, -16.4, .2), (22050, -16.4, 0)]


def microphone_ports(dry):
    hz, lead, db = np.transpose(PORTS)
    n = next_fast_len(N)
    f = np.fft.rfftfreq(n, 1 / SR)
    half = makeup_ratio(np.interp(f, hz, db) / 2) * np.exp(-.5j * np.interp(f, hz, lead))
    return irfft(rfft(dry, n) * np.array([half, 1 / half]), n)[:, :N]


def roll_off(x):
    return signal.sosfilt(signal.butter(12, 17160, fs=SR, output="sos"), x)


def record(dry):
    rounded = np.tanh(microphone_ports(dry) / 1.1) * 1.1
    mix = signal.sosfilt(signal.ellip(8, .3, 70, 16500, fs=SR, output="sos"), rounded)
    return roll_off(mix)


dry = scene()
out = record(dry)
dump(out)
```